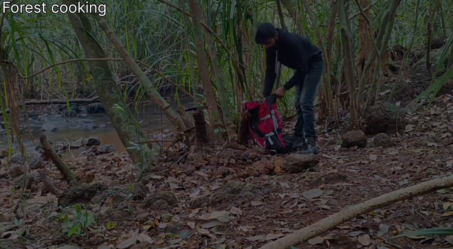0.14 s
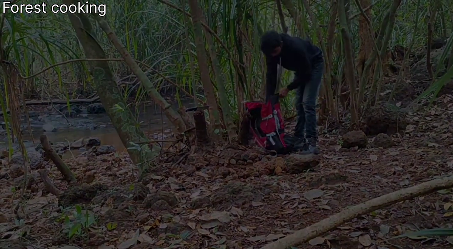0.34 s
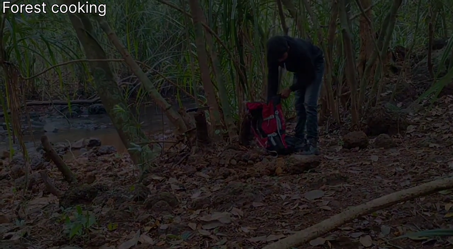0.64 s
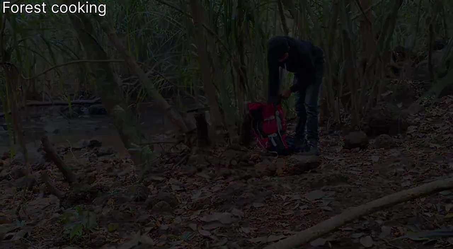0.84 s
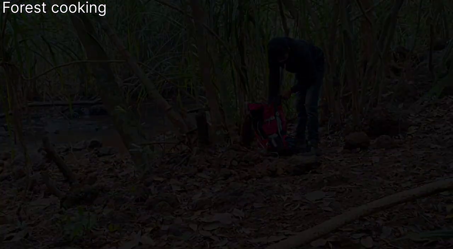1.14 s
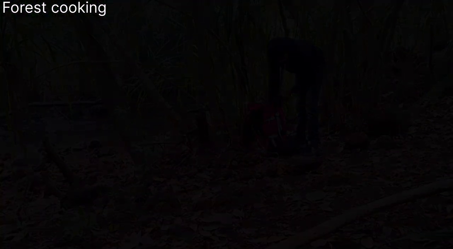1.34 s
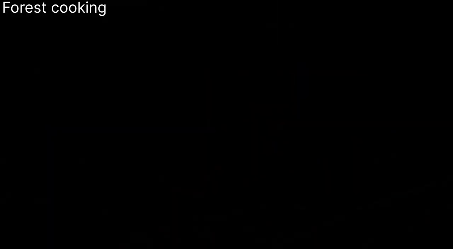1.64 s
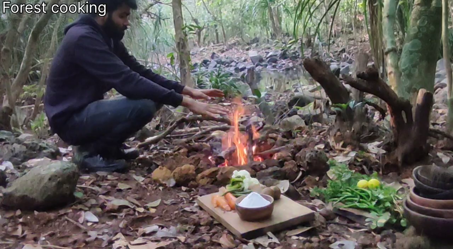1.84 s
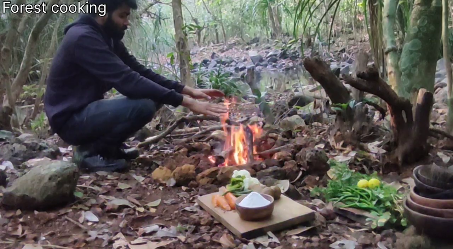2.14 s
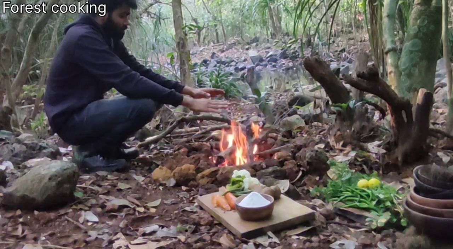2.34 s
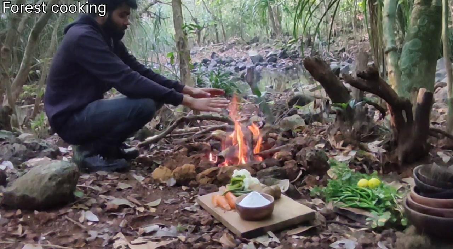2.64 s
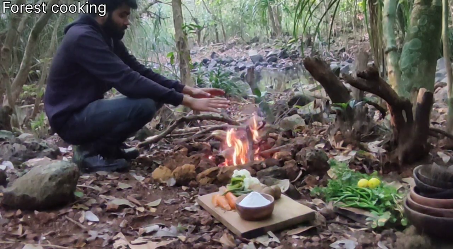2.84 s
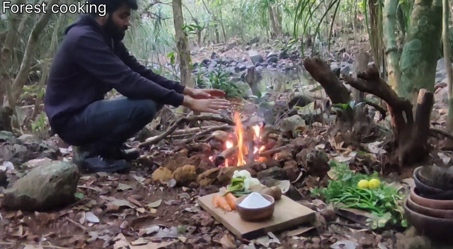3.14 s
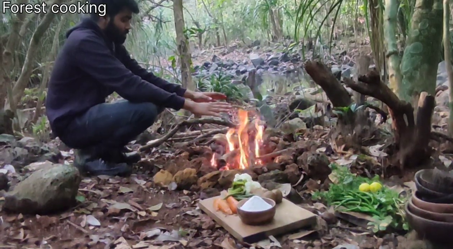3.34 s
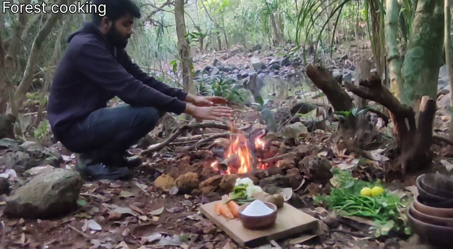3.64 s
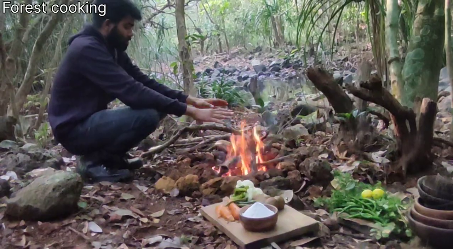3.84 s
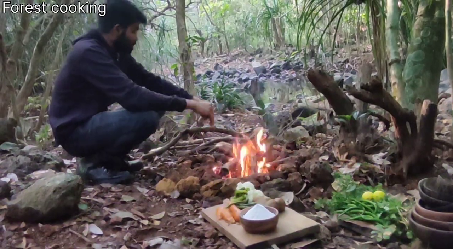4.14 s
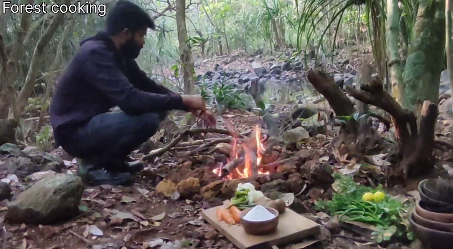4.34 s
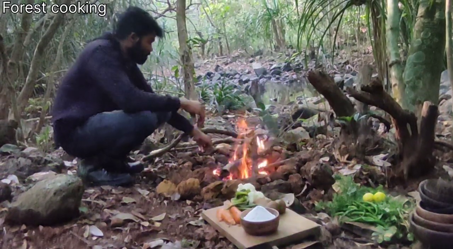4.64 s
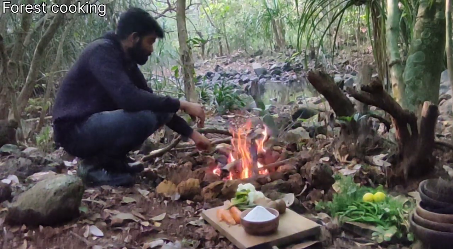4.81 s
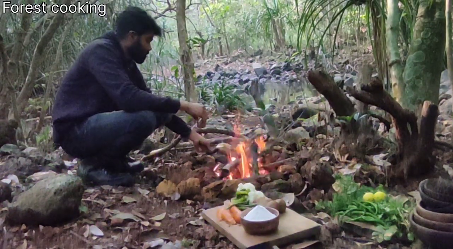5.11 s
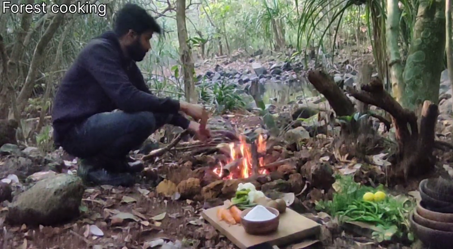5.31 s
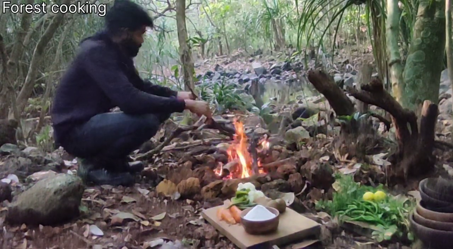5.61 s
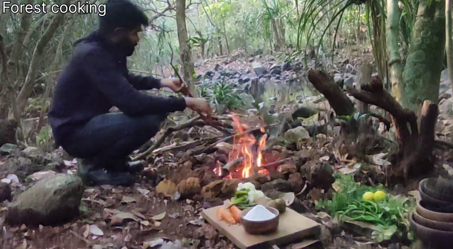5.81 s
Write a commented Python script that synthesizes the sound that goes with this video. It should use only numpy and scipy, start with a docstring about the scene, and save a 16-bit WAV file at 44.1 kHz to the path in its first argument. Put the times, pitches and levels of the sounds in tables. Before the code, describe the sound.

For the first 1.7 seconds, high, quickly pulsing insects trill over the soft, even wash of a forest stream. A faint hollow hoot comes from the left at about 0.3 seconds, among thin distant whistles. After a very brief silence, a camp fades in by 2 seconds: a small fire flutters low and crackles close to the microphone, while insects pulse more slowly and grow gradually louder. Three soft low thumps fall between 1.8 and 2.5 seconds. Far birds whistle and chirp on and off from 2 to 5.5 seconds, and dry leaves stir lightly. Sharper cracks stand out at about 4.2 and 5.2 seconds. At about 5.8 seconds a stick pokes the fire: dry wood snaps in a quick cluster, the loudest moment, and the stick knocks and scrapes on the hearth stones until about 6 seconds.

```python
"""A small camp fire flutters and crackles close to the microphone, in a wood full of trilling insects.
The scene opens beside a stream and, after a brief silence, moves to the camp; far birds call at both.
The insects click tuned membranes over a rush of water and leaves; the fire cracks as wood fibres tear.
At the end a stick is poked into it: dry wood snaps, and the stick knocks and scrapes on the hearth stones."""
import sys
import numpy as np
from scipy import signal
from scipy.fft import rfft, irfft, next_fast_len
from scipy.io import wavfile

SR = 44100
rng = np.random.default_rng(int(sys.argv[2]) if len(sys.argv) > 2 else 0)


def log_audio(samples):
    """Write samples as a 16-bit WAV file to the path given in sys.argv[1]."""
    # one column per channel
    frames = np.atleast_2d(samples).T
    # limit to full scale, then quantise
    limited = np.clip(frames, -1, 1)
    pcm = np.round(limited * 32767).astype(np.int16)
    wavfile.write(sys.argv[1], SR, pcm)


N = 263277
T = np.arange(N) / SR
FFT_SIZE = 2 * next_fast_len(N // 2 + 1)
BANK_END_S, CAMP_START_S = 1.713, 1.75


def from_db(db):
    return 10 ** (np.asarray(db) / 20)


def rms_one(x):
    return x / np.sqrt(np.mean(x ** 2) + 1e-20)


def pan(lean_db):
    """Left and right gains; a positive lean is to the left of the microphone."""
    return from_db(np.array([[.5], [-.5]]) * lean_db)


def at_hz(points, hz):
    """Read a curve on a log-frequency axis."""
    point_hz, values = np.array(points).T
    return np.interp(np.log(hz + 1), np.log(point_hz), values)


def drift(rate_hz):
    """A smooth random wander with spread 1."""
    r = np.exp(-80 * np.pi * rate_hz / SR)
    slow = signal.lfilter([1], [1, -2 * r, r * r], rng.standard_normal(N // 40 + 2002))[2000:]
    return np.interp(np.arange(N) / 40, np.arange(len(slow)), rms_one(slow))


def hump(middle_s, length_s):
    """A smooth rise and fall, 1 at its middle."""
    return np.exp(-(2 * (T - middle_s) / length_s) ** 2)


def burst(start_s, t60_s, rise_s=0.00056):
    """An envelope that rises quickly and dies away."""
    age = np.maximum(T - start_s, 0)
    return (1 - np.exp(-age / rise_s)) * np.exp(-np.log(1000) * np.minimum(age / t60_s, 10))


def resonate(x, hz, width_hz):
    """One resonance with gain 1 at its peak."""
    r = np.exp(-np.pi * width_hz / SR)
    feedback = [1, -2 * r * np.cos(2 * np.pi * hz / SR), r * r]
    return signal.lfilter(np.array([1, 0, -1]) * (1 - r * r) / 2, feedback, x + 1e-18)


def body(x, modes):
    """Resonances in parallel, signs alternating; white noise keeps about its level."""
    power = sum(from_db(db) ** 2 * np.pi * width / SR for hz, width, db in modes)
    ring = sum((-1) ** k * from_db(db) * resonate(x, hz, width) for k, (hz, width, db) in enumerate(modes))
    return ring / np.sqrt(power)


def echo_cloud(t60_s):
    """One second of dense, dying echoes, different on each side of the microphone."""
    return rng.standard_normal((2, SR)) * np.exp(-np.log(1000) * T[:SR] / t60_s)


def trees(x, t60_s):
    """Trunks and leaves scatter a sound back to the microphone as echoes."""
    echoes = echo_cloud(t60_s)
    echoes /= np.sqrt(np.sum(echoes ** 2, axis=1, keepdims=True))
    return signal.fftconvolve(np.atleast_2d(x), echoes, axes=1)[:, :N]


def foliage(x, t60_s):
    """Dense leaves smear each click in time without colouring it."""
    echoes = rfft(echo_cloud(t60_s), FFT_SIZE)
    return irfft(rfft(x, FFT_SIZE) * echoes / np.abs(echoes), FFT_SIZE)[:, :N]


# how alike the air is on the two sides of the microphone: frequency_hz, correlation
AIR_LIKENESS = [(25, 0.81), (60, 0.15), (150, 0.78), (500, 0.23), (1200, 0), (16000, 0)]
# bands of the rush that swell and sink on their own: edge_hz
RUSH_BANDS = [0, 900, 1600, 2500, 3500, 5000, 9000, 22050]


def air(spectrum, lean, lump_db, rumble_db=0, rush_db=0):
    """A wide, patchy rush all round the microphone, over a lumpy rumble nearer the centre."""
    mid, side = rfft(rng.standard_normal((2, FFT_SIZE)))
    hz = np.linspace(0, SR / 2, len(mid))
    alike = np.clip(at_hz(AIR_LIKENESS, hz), -1, 1)
    noise = np.sqrt(1 + alike) * mid + np.sqrt(1 - alike) * side * [[1], [-1]]
    noise *= from_db(at_hz(spectrum, hz)) * pan(at_hz(lean, hz))
    low_share = 1 / (1 + (hz / 400) ** 4)
    rumble = irfft(noise * low_share)[:, :N]
    rush = np.zeros((2, N))
    for bottom, top in zip(RUSH_BANDS, RUSH_BANDS[1:]):
        band = irfft(noise * (1 - low_share) * (hz >= bottom) * (hz < top))[:, :N]
        rush += band * from_db(2 * drift(12.5))
    rumble *= from_db(rumble_db + lump_db * drift(11))
    rush *= from_db(rush_db + 0.66 * drift(29))
    return rms_one(rumble + rush)


# water, leaves and moving air on the stream bank: frequency_hz, relative_db
STREAM_SPECTRUM = [(25, 4), (60, -2.5), (140, -15), (260, -14.5), (410, -22), (800, -19.5), (1300, -21),
                   (2100, -21), (2800, -23.5), (5000, -25.5), (8000, -27.5), (8800, -33.5), (16000, -33.5)]


def stream():
    """Running water and leaves make an even wash across the microphone."""
    return from_db(-55.5) * air(STREAM_SPECTRUM, lean=[(25, 0), (16000, 0.52)], lump_db=2.1)


# leaves and moving air round the camp: frequency_hz, relative_db
CAMP_SPECTRUM = [(25, 3), (60, -4.5), (150, -9), (270, -15), (360, -20), (650, -20.5), (1400, -21.5),
                 (2300, -18.5), (3600, -26), (5000, -22.5), (8000, -41), (8800, -37), (11000, -34.5),
                 (16000, -33.5)]
# the side they are heard from: frequency_hz, lean_db
CAMP_BALANCE = [(25, 0.5), (600, 0), (2200, 5.5), (3300, -0.5), (4800, 1), (8000, -14.5), (9200, -2.5),
                (13000, -0.5)]
# the nearby flame flares up: middle_s, length_s, rise_db
FLAME_FLARES = [(2.14, 0.33, 3.5), (2.4, 0.089, 5.5), (2.592, 0.089, 6.5), (5.05, 0.2, 3.5),
                (5.92, 0.13, 4.5)]
# dry leaves stir at the camp: middle_s, length_s, rise_db
LEAF_RUSTLES = [(2.193, 0.093, 1.5), (2.783, 0.09, 1), (3.16, 0.21, 1.5), (3.55, 0.53, 2),
                (4.777, 0.24, 1.5), (5.254, 0.22, 2), (5.774, 0.51, 4.5)]


def camp_air():
    """The flame flutters in the low rumble, and stirring leaves lift the rush above it."""
    flutter_db = 2.5 + sum(db * hump(middle, length) for middle, length, db in FLAME_FLARES)
    rustle_db = 2 + sum(db * hump(middle, length) for middle, length, db in LEAF_RUSTLES)
    wash = air(CAMP_SPECTRUM, CAMP_BALANCE, lump_db=2.0, rumble_db=flutter_db, rush_db=rustle_db)
    return from_db(-54.5) * wash


# one far hoot, off to the left at the stream: peak_s, pitch_hz, level_db
FAR_HOOT = (0.337, 562, -66.5)
# its harmonics, lowest first: relative_db
HOOT_HARMONICS = [0.8, -7.5, -11]


def hoot(peak_s, hz, db, swell_db_per_s=44, fade_db_per_s=200, hold_s=0.043):
    """A bird's hollow note swells slowly, lifts in pitch at its peak and fades faster."""
    level_db = db - swell_db_per_s * np.maximum(peak_s - T, 0)
    level_db -= fade_db_per_s * np.clip(T - peak_s - hold_s, 0, 1)
    pitch_hz = hz * (1 + 0.01 * hump(peak_s, 0.063) + 0.017 * drift(58))
    phase = 2 * np.pi * np.cumsum(pitch_hz) / SR
    tone = sum(from_db(gain_db) * np.sin(k * phase) for k, gain_db in enumerate(HOOT_HARMONICS, 1))
    return pan(15.5) * from_db(level_db) * tone


def bird_note(start_s, length_s, hz, glide, db, lean_db, waver):
    """One bird note; its glide and waver are shares of its pitch."""
    out = np.zeros((2, N))
    singing = (T > start_s) & (T < start_s + length_s)
    progress = (T[singing] - start_s) / length_s
    pitch_hz = hz * (1 + glide * (progress - .5)) * (1 + waver * drift(108)[singing])
    phase = 2 * np.pi * np.cumsum(pitch_hz) / SR
    envelope = np.sqrt(np.abs(np.sin(np.pi * progress)))
    out[:, singing] = from_db(db) * pan(lean_db) * envelope * np.sin(phase)
    return out


# birds whistle or rasp far off in the wood:
# start_s, length_s, pitch_hz, glide_share, level_db, lean_db, waver_share
FAR_WHISTLES = [(0.083, 0.05, 1298, -0.083, -65, 2, 0.041), (.49, 0.17, 1178, 0.038, -72, 10, 0.039),
                (0.947, 0.11, 5670, 0.027, -64, 1, 0.027), (2.03, 0.055, 5020, 0.04, -66, -12, 0.012),
                (2.122, 0.043, 3760, -0.0089, -61, -6, 0.03), (2.813, 0.073, 1556, 0.024, -59, 2, 0.034),
                (2.915, 0.056, 3005, -0.02, -62.5, -3, 0.0092), (2.977, 0.049, 2970, 0.024, -65, -6, 0.008),
                (3.032, 0.041, 3170, -0.048, -59, 1, 0.02), (3.092, 0.15, 1880, 0.0053, -64, 8, 0.032),
                (3.213, 0.087, 1950, -0.02, -57.5, 4, 0.028), (3.487, 0.03, 3820, 0.13, -58.5, -1, 0.105),
                (3.705, 0.14, 2490, 0.033, -63.5, 8, 0.068), (5.347, 0.074, 1165, -0.084, -60, -4, 0.041),
                (5.392, 0.11, 1151, 0.03, -61, 3, 0.035)]
# a small bird's thin, falling chirps, left of the camp: start_s, length_s, pitch_hz, level_db
FAR_CHIRPS = [(2.062, 0.075, 6800, -52.5), (2.14, 0.045, 6650, -60), (3.084, 0.06, 6850, -60),
              (4.835, .06, 7000, -57), (4.911, 0.07, 6750, -57)]


def birds(flutter_db=4.0):
    """Far whistles and the hoot flutter and arrive partly as echoes; the chirps arrive only as echoes."""
    whistles = sum(bird_note(*row) for row in FAR_WHISTLES) * from_db(flutter_db * drift(36))
    chirps = sum(bird_note(start, length, hz, glide=-0.024, db=db, lean_db=6, waver=0.03)
                 for start, length, hz, db in FAR_CHIRPS)
    hooting = hoot(*FAR_HOOT) * from_db(flutter_db * drift(31))
    echoes = from_db(0.5) * trees(chirps, t60_s=0.06) + trees(chirps, t60_s=0.93)
    echoes += trees(whistles, t60_s=1.0) + from_db(3) * trees(hooting, t60_s=0.22)
    return from_db(-3) * (whistles + hooting) + echoes


def throb(rate_hz, depth_db):
    """The slightly uneven pulsing that the insects share, in dB."""
    cycles = np.cumsum(rate_hz * (1 + 0.098 * drift(1.3))) / SR
    return depth_db * np.sin(2 * np.pi * cycles)


# insects in the leaves by the stream: pitch_hz, width_hz, level_db, lean_db, clicks_per_s, throb_share
STREAM_SINGERS = [(6210, 360, -60, -1, 110, 0.14), (6550, 270, -68.5, 6, 210, 0.55),
                  (6920, 230, -71, 13, 130, 0.79), (7226, 270, -65.5, -2, 370, 0.45),
                  (8300, 410, -77.5, 7, 340, 0.57), (12400, 1100, -80, 1, 190, 0.54)]
# insects round the camp: same columns
CAMP_SINGERS = [(5726, 390, -62, 0.45, 122, 0.29), (6033, 250, -62, 3.1, 160, 0.35),
                (6470, 260, -72.5, 2, 160, 0.7), (6890, 230, -70, 3, 230, 0.77),
                (7560, 640, -77, 8.4, 100, 0.6), (7930, 720, -73.5, 6.7, 200, 0.45)]


def insects(kinds, throb_db, jitter, scatter_t60_s, flicker_db):
    """Each kind is four singers, left and right, whose uneven trains of clicks ring a tuned membrane."""
    chorus = np.zeros((2, N))
    for hz, width_hz, db, lean_db, clicks_per_s, throb_share in kinds:
        clicks = np.zeros((2, N))
        for singer in range(4):
            cycles = np.cumsum(clicks_per_s * (1 + jitter * drift(25))) / SR + rng.random()
            clicks[singer % 2] += np.diff(np.floor(cycles), prepend=0) * from_db(1.4 * drift(27))
        membrane = signal.butter(2, [hz - width_hz / 2, hz + width_hz / 2], "band", fs=SR, output="sos")
        song = signal.sosfilt(membrane, foliage(clicks, scatter_t60_s))
        song /= np.std(song, axis=1, keepdims=True)
        level_db = db + throb_share * (throb_db + flicker_db * drift(22))
        chorus += from_db(level_db) * pan(lean_db) * song
    return chorus


# soft low thumps: start_s, level_db, pitch_hz, lean_db
LOW_THUMPS = [(1.851, -42.5, 106, 5), (1.955, -41.5, 81, -9), (2.429, -41, 108, 0)]


def thumps():
    """Each thump is a low, heavily damped push of air."""
    return sum(from_db(db) * pan(lean_db) * burst(start, t60_s=0.05) * np.sin(2 * np.pi * hz * (T - start))
               for start, db, hz, lean_db in LOW_THUMPS)


# resonances of the stick: pitch_hz, width_hz, relative_db
STICK_MODES = [(405, 98, 1), (626, 75, 9), (690, 36, 1), (1034, 89, -7), (1184, 39, -13), (1630, 85, -7),
               (2130, 150, -8)]
# knocks on the near hearth stones, pitched by the point of contact: start_s, level_db, pitch_ratio
STICK_KNOCKS = [(5.780, -40, .98), (5.787, -48, 0.92), (5.826, -41, 1.06), (5.874, -54, 1.18),
                (5.922, -50, 1.1), (5.945, -45.5, 1.04)]
# short strokes over the stones: middle_s, length_s, level_db
STICK_SCRAPES = [(5.754, 0.23, -62), (5.878, 0.04, -54), (5.96, 0.1, -52)]


def stick(echo_db, contact_s=0.0039, slips_per_s=660, judder=0.057):
    """Soft knocks ring the wood; dragged over stone, it slips unevenly near its main mode and groans."""
    wood = np.zeros(N)
    for start, db, ratio in STICK_KNOCKS:
        age = T[T >= start] - start
        for hz, width_hz, mode_db in STICK_MODES:
            envelope = (1 - np.exp(-age / contact_s)) * np.exp(-np.pi * width_hz * age)
            wood[T >= start] += from_db(db + mode_db) * envelope * np.sin(2 * np.pi * ratio * hz * age)
    drag = sum(from_db(db) * hump(middle, length) for middle, length, db in STICK_SCRAPES)
    slip_phase = 2 * np.pi * np.cumsum(slips_per_s * (1 + judder * drift(152))) / SR
    grit = from_db(-8.5) * body(rng.standard_normal(N), STICK_MODES)
    groan = from_db(3.3 * drift(50)) * np.sin(slip_phase)
    wood += drag * (groan + grit)
    return wood + from_db(echo_db) * trees(wood, t60_s=0.27)


# the colour of cracking wood: pitch_hz, width_hz, relative_db
CRACK_MODES = [(2330, 1070, 5.5), (4480, 2200, 10), (6570, 1740, 15.5), (8070, 780, 17.5)]
# twigs snap close to the microphone: start_s, level_db, t60_s, brightness_db, edge_hz, lean_db
TWIG_SNAPS = [(2.14, -53, 0.36, -31, 9000, 4), (2.425, -56.5, 0.33, -1, 14000, 0),
              (2.705, -56.5, 0.68, -19, 8900, 4), (3.49, -64, .05, -17, 9000, 2),
              (3.622, -65, 0.055, 1, 11500, -1), (4.216, -59.5, 0.16, 9, 13000, -2),
              (4.228, -38.5, 0.0097, 1, 12500, -1), (4.301, -66, 0.068, 8, 10400, -1),
              (4.507, -66, .04, 11, 15000, -1), (4.71, -54, .035, -2, 13000, 7),
              (4.953, -65, 0.021, 11, 13000, -5), (5.195, -48, 0.17, -1.5, 9500, 1),
              (5.27, -60, 0.42, -22, 9000, -3), (5.469, -56.5, 0.13, -23.5, 9000, 9),
              (5.654, -54, 0.35, -21, 9000, 10), (5.752, -52, 0.28, -10, 9500, 4),
              (5.7755, -32.5, 0.023, -2.5, 12300, -9), (5.779, -32.5, 0.016, -15, 12500, 11),
              (5.783, -45, 0.96, -8.5, 13700, 1.5), (5.791, -39, 0.015, -13, 11000, 13),
              (5.868, -73, 0.082, -14, 9200, 13)]


def fire(echo_db, ticks_per_s=8.6, tick_db=-63, tick_decay_s=0.012, edge_width_hz=7300):
    """Fibres tear in gritty bursts, each with its own bright edge; dull embers tick at random."""
    fibres = rng.standard_normal((2, N)) + 0.19 * rng.standard_normal(N)
    grit = rms_one(fibres * (rng.random(N) < .35))
    ticking = rng.random(N) < ticks_per_s / SR
    ticks = ticking * from_db(tick_db + np.clip(rng.normal(0, 6.9, N), -10, 8))
    force = signal.lfilter([1], [1, -np.exp(-1 / (tick_decay_s * SR))], ticks + 1e-18) * np.ones((2, 1))
    edges = np.zeros((2, N))
    for start, db, t60_s, brightness_db, edge_hz, lean_db in TWIG_SNAPS:
        tear = from_db(db) * pan(lean_db) * burst(start, t60_s)
        force += tear
        edge = resonate(tear * grit, edge_hz, edge_width_hz)
        edges += from_db(brightness_db) * resonate(edge, edge_hz, edge_width_hz)
    cracks = body(force * grit, CRACK_MODES) + edges
    return cracks + from_db(echo_db) * trees(cracks, t60_s=0.11)


def scene():
    """The microphone stands first on the stream bank, then by the fire; birds call over both."""
    bank = insects(STREAM_SINGERS, throb(16, depth_db=2.5), jitter=.09, scatter_t60_s=0.053, flicker_db=3.5)
    bank += stream()
    camp = insects(CAMP_SINGERS, throb(4.6, depth_db=1.6), jitter=.1, scatter_t60_s=0.036, flicker_db=3.0)
    # the camp chorus comes in softly, then grows slowly louder
    camp *= from_db(1.35 + 0.62 * (T - CAMP_START_S) - 2 * hump(CAMP_START_S, 0.45))
    camp += camp_air()
    camp += thumps() + fire(echo_db=-7) + stick(echo_db=-7)  # close by, so the echoes are weak
    camp -= resonate(camp, hz=5220, width_hz=270)  # a narrow hollow just under the insects' pitch
    fade_out = np.clip((BANK_END_S - T) / 0.016, 0, 1)
    fade_in = np.clip((T - CAMP_START_S) / 0.25, 0, 1) ** 0.5
    return fade_out * bank + fade_in * camp + birds()


def record(dry, cutoff_hz=15700):
    """A steep low-pass cuts the highest treble."""
    return signal.sosfilt(signal.ellip(10, .2, 70, cutoff_hz, fs=SR, output="sos"), dry)


dry = scene()
out = record(dry)
log_audio(out)
```